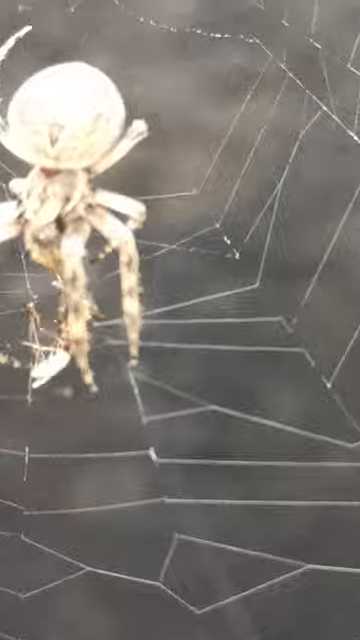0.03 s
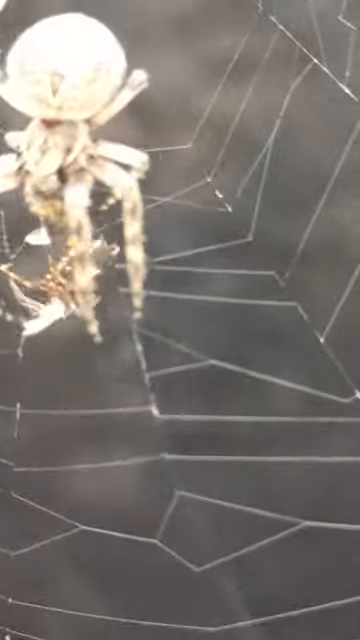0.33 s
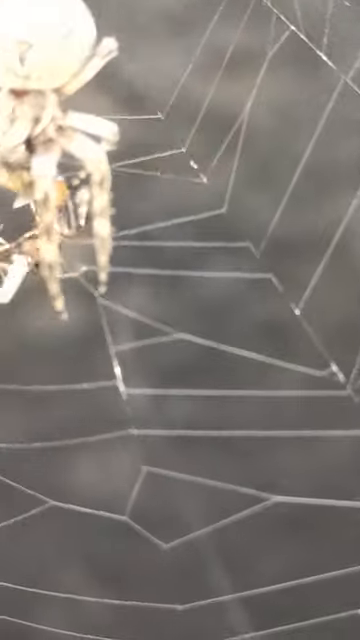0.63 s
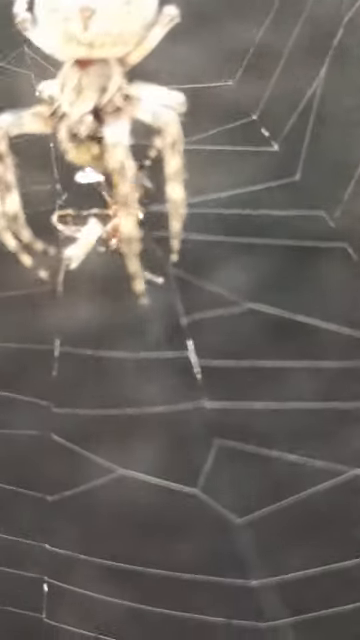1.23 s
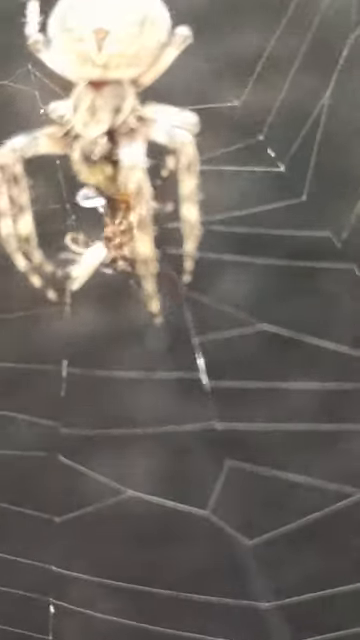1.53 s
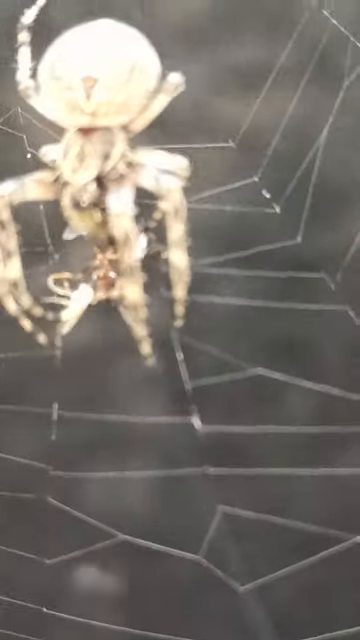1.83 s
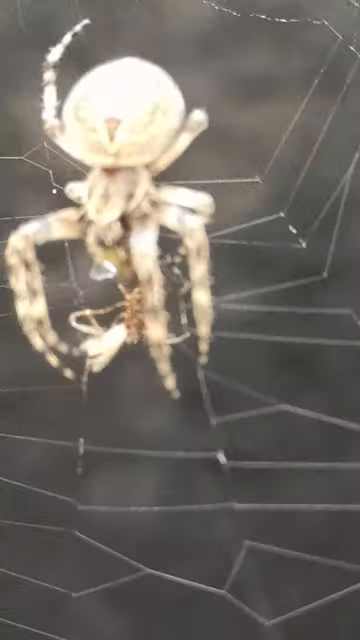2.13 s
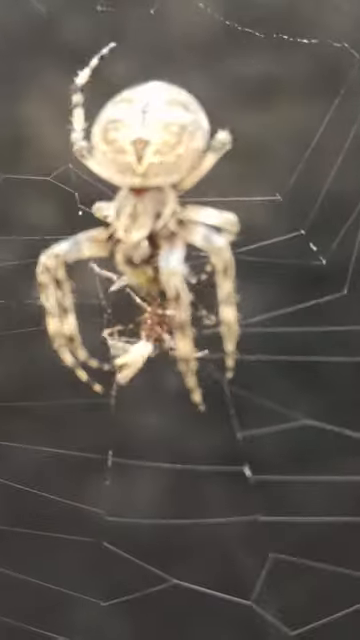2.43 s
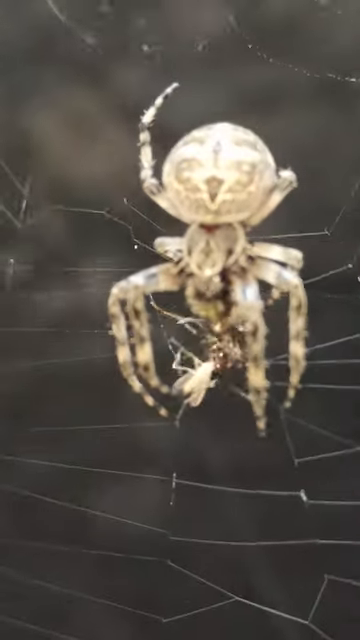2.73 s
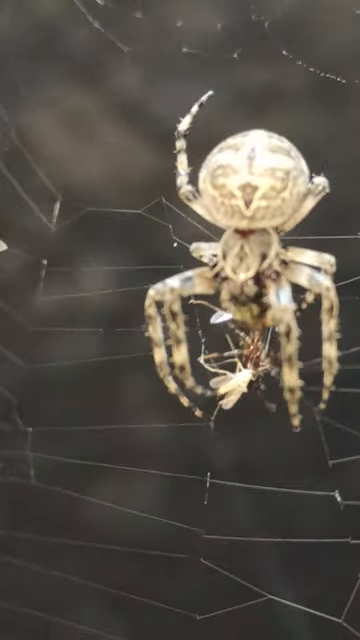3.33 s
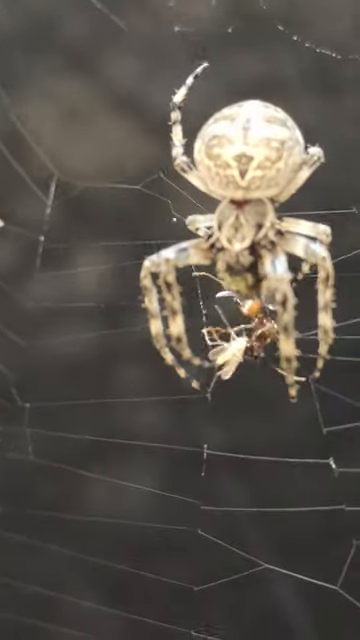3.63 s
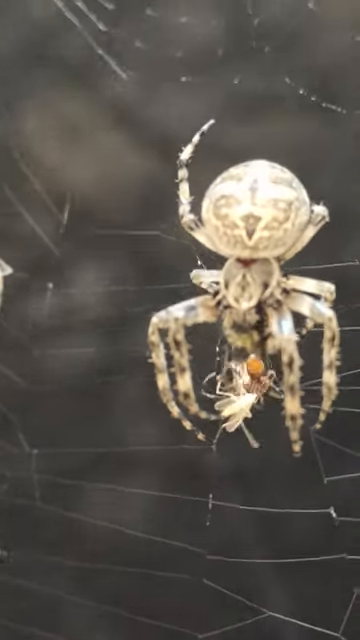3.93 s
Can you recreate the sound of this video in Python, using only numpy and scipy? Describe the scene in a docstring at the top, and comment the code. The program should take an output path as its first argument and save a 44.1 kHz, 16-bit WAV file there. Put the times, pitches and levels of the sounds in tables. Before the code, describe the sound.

Katydids and crickets chirp densely outdoors at night, with distant traffic and light microphone handling.

```python
"""Three katydids rasp in the night, each dragging a scraper over file teeth that ring its wing.
Behind them a far crowd sizzles, a small cricket trills at 9 kHz, two far crickets chirp below it and a
thin whine pulses on top. A distant engine climbs and falls over traffic rumble, mains hum and one brief
drone. Fingers click, rub and thud on the hand-held microphone. Near the end the level of the insects,
rumble and hum dips briefly."""
import sys
import numpy as np
from scipy import signal
from scipy.fft import rfft, irfft
from scipy.io import wavfile
from scipy.ndimage import uniform_filter1d, minimum_filter1d

SR = 44100
rng = np.random.default_rng(int(sys.argv[2]) if len(sys.argv) > 2 else 0)


def transcribe(u):
    """Save the signal u as a 16-bit wav file named by the first command-line argument.

    u: samples, shape (n,) or (channels, n), limited to [-1, 1]; the rate is SR.
    q: integer samples, one column per channel.
    """
    v = np.clip(np.atleast_2d(u).T, -1, 1)
    q = np.round(v * 32767).astype(np.int16)
    wavfile.write(sys.argv[1], SR, q)


N = 176400

# EQ curves of the rumble and air, the insect crowd and a finger rub: f/Hz, relative level/dB
AIR_EQ = [(20, -24), (35, -14), (55, -2.5), (90, 1.5), (130, 2), (190, 0), (260, -7.5), (400, -11.5),
          (700, -14), (1200, -17.5), (3000, -27.5), (8000, -33), (15000, -33.5)]
CROWD_EQ = [(1200, -30), (1550, -20), (1850, -12.5), (2200, -14), (2850, -9), (3550, -11.5), (4000, -5.5),
            (4700, 0.5), (5400, -2), (5800, -0.5), (6150, 0), (6400, -10), (6650, -22), (7100, -28),
            (8300, -31.5), (15000, -33.5)]
RUB_EQ = [(2000, -34), (4000, -2), (5400, 5), (7000, -18), (9000, -21), (11000, -18), (12000, -26),
          (15000, -31)]
# mains hum partials: f/Hz, level/dB
HUM_PARTIALS = [(120, -37), (240, -42), (600, -45.5), (720, -53), (1081, -61)]
# engine revs: t/s, firing f/Hz, level/dB
ENGINE_REVS = [(0, 81.6, -37.5), (.28, 90.7, -34), (.5, 97.4, -43), (.75, 104.6, -27.5), (1.0, 113.1, -24),
               (1.251, 117.6, -36.5), (1.48, 123, -39), (1.6, 110.8, -27), (1.75, 102.2, -48.5),
               (2.15, 98, -37), (2.4, 101.7, -30.5), (2.55, 103.4, -37), (2.7, 104.1, -27.5),
               (2.92, 104.9, -25), (3.05, 113.7, -33.5), (3.4, 122, -26.5), (3.65, 126.8, -35),
               (3.799, 124, -53)]
# thuds of the hand on the casing: t/s, level/dB, decay t60/s, upper edge f/Hz
THUDS = [(0.729, -18.5, 0.34, 170), (.785, -23.5, 0.32, 210), (1.13, -21, 0.19, 172),
         (2.655, -27, 0.25, 552.5), (2.76, -28, 0.15, 300), (2.89, -24.5, .3, 189.7),
         (3.93, -31, 0.16, 400)]
# finger clicks: t/s, level/dB, ring f/Hz, ring t60/s
CLICKS = [(2.2499, -9.5, 6300, 0.039), (2.2555, -10, 6100, .02), (2.2626, -12, 6700, 0.01),
          (3.066, -1, 5520, 0.0077), (3.0712, 0, 5100, 0.0081), (3.13, 12, 5100, 0.0051),
          (3.1535, -6, 5400, .006), (3.1998, -5, 5600, 0.0047)]
# light rubs across the casing: centre t/s, level/dB
RUBS = [(1.125, -29), (3.172, -20.5)]
# chirps of the low and the high far cricket: centre t/s, level/dB
LOW_CHIRPS = [(.07, -33), (.216, -36), (.669, -39.5), (.824, -38), (.968, -32.5), (1.6, -48), (1.74, -35),
              (1.881, -38), (2.092, -44), (2.388, -40), (2.503, -42), (2.658, -36), (2.79, -38),
              (3.497, -36), (3.835, -37), (3.974, -39)]
HIGH_CHIRPS = [(.193, -53), (.488, -49), (.752, -56), (1.028, -51), (1.256, -47), (1.605, -50),
               (1.822, -53), (2.111, -45), (2.438, -49), (2.64, -51), (2.891, -48), (3.497, -50)]
# trills of the small cricket: first pulse t/s, pulse count, level/dB
TRILLS = [(.1941, 8, -28.5), (0.4744, 8, -28), (.7403, 7, -28), (1.0246, 8, -28), (1.307, 8, -28),
          (1.5812, 8, -28), (1.857, 8, -27.5), (2.1345, 7, -28), (2.3917, 8, -27), (2.6553, 8, -30),
          (2.9325, 8, -29), (3.222, 7, -31.5), (3.475, 8, -32.5), (3.722, 8, -35.5), (3.959, 8, -36)]
# wing strokes of the broad, the shrill and the far katydid: centre t/s, relative level/dB
BROAD_RASPS = [(.02, -23.5), (.155, -26.5), (.225, -29), (.301, -25), (.42, -29), (.724, -34),
               (.865, -28.5), (1.11, -23.5), (1.238, -25), (1.396, -29.5), (1.586, -21), (1.74, -20.5),
               (1.884, -21), (2.022, -21), (2.125, -27), (2.275, -25), (2.41, -23), (2.53, -24.5),
               (2.665, -30), (2.806, -23.5), (2.96, -22), (3.095, -22), (3.24, -24), (3.38, -30),
               (3.53, -30.5), (3.97, -31.5)]
SHRILL_RASPS = [(.015, -16.5), (.09, -22), (.165, -19), (.245, -21.5), (.336, -19), (.477, -22), (.6, -17),
                (.722, -17.5), (.848, -17), (.976, -17), (1.106, -20), (1.234, -20.5), (1.373, -19),
                (1.53, -17.5), (1.62, -18.5), (1.715, -17.5), (1.845, -18), (1.98, -15.5), (2.102, -16.5),
                (2.2, -21), (2.289, -21), (2.408, -20), (2.583, -17.5), (2.70, -17), (2.842, -14.5),
                (2.975, -20.5), (3.11, -18.5), (3.255, -16.5), (3.401, -20), (3.52, -24.5), (3.75, -21.5),
                (3.86, -18.5), (3.98, -20)]
FAR_RASPS = [(.04, -22.5), (.164, -22), (.27, -22.5), (.431, -19.5), (.569, -22), (.708, -22), (.832, -25),
             (.963, -21), (1.087, -23), (1.221, -22), (1.36, -23), (1.53, -21), (1.68, -27), (1.825, -20),
             (1.997, -21.5), (2.14, -22.5), (2.409, -23), (2.563, -20.5), (2.805, -21), (2.93, -27)]
# their wing resonances: f/Hz, width/Hz, relative level/dB
BROAD_WING = [(1855, 430, -4.5), (2880, 1000, -0.5), (4220, 620, 2), (5100, 430, -0.5), (7200, 1200, -68),
              (11100, 3400, -27)]
SHRILL_WING = [(2750, 1350, -16), (4150, 700, -3.5), (4700, 690, 2.5), (5220, 600, -1.5)]
FAR_WING = [(5500, 300, 0), (6000, 230, -1)]
# fader ride on insects, rumble and hum, held at its first value until the dip: t/s, gain/dB
FADER = [(3.25, -4), (3.321, -6.5), (3.45, -6), (3.6, -7.5), (3.7, -12.3), (3.8, -10.2), (3.91, -7),
         (3.97, -4.5)]


def undb(db):
    """Decibels to gain."""
    return 10 ** (np.asarray(db) / 20)


def unit(x):
    """Scale to rms 1."""
    return x / np.sqrt(np.mean(x ** 2))


def clock():
    """Time of every sample in seconds."""
    return np.arange(N) / SR


def wander(rate_hz):
    """Smooth random modulation with a spread near 1."""
    hold = int(SR / rate_hz)
    steps = np.repeat(rng.standard_normal(N // hold + 1), hold)
    return .97 * uniform_filter1d(uniform_filter1d(steps, hold), hold)[:N]


def equalise(x, curve):
    """Shape a sound with an EQ curve (f/Hz, level/dB), at rms 1."""
    hz, db = np.array(curve, float).T
    f = np.maximum(np.arange(N // 2 + 1) * SR / N, 1)
    return unit(irfft(rfft(x) * undb(np.interp(np.log(f), np.log(hz), db)), N))


def ring(x, resonances):
    """Play a sound through steep resonances (f/Hz, width/Hz, level/dB), at rms 1."""
    f = np.maximum(np.arange(N // 2 + 1) * SR / N, 1)
    power = sum(undb(db) ** 2 / (1 + ((f * f - hz * hz) / (f * width)) ** 2) ** 2
                for hz, width, db in resonances)
    return unit(irfft(rfft(x) * np.sqrt(power), N))


def swells(cues, length_s):
    """A bell-shaped swell on each cue (t/s, level/dB), length_s wide at half power."""
    t = clock()
    power = sum(undb(db) ** 2 * np.exp2(-np.minimum((2 * (t - at) / length_s) ** 2, 100))
                for at, db in cues)
    return np.sqrt(power)


def foliage(x, wet_db, t60_s=.11):
    """Leaves and ground scatter a short tail after the direct sound."""
    t = np.arange(SR // 5) / SR
    tail = rng.standard_normal(len(t)) * np.exp(-np.log(1000) * t / t60_s)
    wet = signal.fftconvolve(x, tail / np.linalg.norm(tail))[:len(x)]
    return (x + undb(wet_db) * wet) / np.hypot(1, undb(wet_db))


def rumble():
    """A gently breathing bed of far traffic and air."""
    return equalise(rng.standard_normal(N), AIR_EQ) * undb(-28 + 1.4 * wander(5.91))


def mains_hum():
    """Electrical plant hums, each partial drifting in level and phase."""
    out = np.zeros(N)
    for hz, db in HUM_PARTIALS:
        peak = np.sqrt(2) * undb(db + 1.1 * wander(5.12))
        out += peak * np.sin(2 * np.pi * hz * clock() + .29 * wander(3.85))
    return out


def drone(at_s=.4, hz=319, db=-40):
    """A faint, far tone swells once and is gone."""
    return unit(np.sin(2 * np.pi * hz * clock())) * swells([(at_s, db)], length_s=.14)


def engine(flutter_db=2, jitter_rad=.48):
    """Only the firing note of a far vehicle carries, climbing between gear changes."""
    at, hz, db = np.array(ENGINE_REVS, float).T
    t = clock()
    phase = 2 * np.pi * np.cumsum(np.interp(t, at, hz)) / SR + jitter_rad * wander(35)
    return unit(np.sin(phase)) * undb(np.interp(t, at, db) + flutter_db * wander(18))


def grip_thuds(attack_s=.0088, low_hz=66):
    """The grip shifts and the casing gives dull, short thuds."""
    t, out = clock(), np.zeros(N)
    for at, db, t60, top_hz in THUDS:
        age = np.maximum(t - at, 0)
        band = signal.butter(2, [low_hz, top_hz], "band", fs=SR, output="sos")
        body = unit(signal.sosfilt(band, rng.standard_normal(N)))
        envelope = (1 - np.exp(-age / attack_s)) * np.exp(-np.log(1000) * age / t60)
        out += undb(db) * body * envelope
    return out


def finger_clicks(attack_s=.00012, crack_s=.0005, crack_db=-20):
    """Fingers tick against the casing: a tiny crack, then a bright ring."""
    t, out = clock(), np.zeros(N)
    for at, db, hz, t60 in CLICKS:
        age = np.maximum(t - at, 0)
        body = np.sin(2 * np.pi * hz * age) * np.exp(-np.log(1000) * np.minimum(age / t60, 10))
        crack = rng.standard_normal(N) * np.exp(-np.minimum(age / crack_s, 20))
        attack = 1 - np.exp(-np.minimum(age / attack_s, 20))
        out += undb(db) * attack * (body + undb(crack_db) * crack)
    return out


def finger_rubs():
    """Fingers brush the casing in short, gritty swipes."""
    grit = rng.standard_normal(N) * (rng.random(N) < .3)
    return equalise(grit, RUB_EQ) * swells(RUBS, length_s=.034)


def whine(hz=14999, period_s=.0667, gap_at_s=.068, gap_s=.012):
    """A thin, very high tone that ducks and wobbles fifteen times a second."""
    t = clock()
    cycles_from_gap = ((t - gap_at_s) / period_s + .5) % 1 - .5
    gate = 1 - .68 * np.exp(-(cycles_from_gap * period_s / gap_s) ** 2)
    roughness = .5 * wander(250)
    wobble = np.cos(2 * np.pi * cycles_from_gap)
    tone = np.sin(2 * np.pi * hz * t + roughness + wobble)
    return unit(tone * gate * undb(1.2 * wander(120))) * undb(-45.5)


def crowd(clicks_per_s=4500, scatter_db=2, flicker_db=.2):
    """Countless far katydids merge into a grainy, lightly flickering sizzle."""
    struck = rng.random(N) < clicks_per_s / SR
    clicks = struck * np.sign(rng.standard_normal(N)) * undb(scatter_db * rng.standard_normal(N))
    return equalise(clicks, CROWD_EQ) * undb(-19.5 + flicker_db * wander(25.03))


def far_cricket(chirps, hz, width_hz, length_s):
    """Chirps blurred by distance into narrow, wavering notes."""
    return ring(rng.standard_normal(N), [(hz, width_hz, 0)]) * swells(chirps, length_s)


def small_cricket(pitch_hz=9125, sag_hz_per_s=60000, spacing_s=.0104, pulse_s=.009, first_pulse_db=-6):
    """Trills of seven or eight pure pulses, each sagging in pitch as the wing slows."""
    t, out = clock(), np.zeros(N)
    for start, count, db in TRILLS:
        for k in range(count):
            at = start + k * spacing_s
            span = slice(*np.searchsorted(t, [at - pulse_s / 2, at + pulse_s / 2]))
            offset = t[span] - at
            hz = pitch_hz * (1 + .004 * rng.standard_normal())
            gain = undb(db + first_pulse_db * (k == 0) + rng.standard_normal())
            cycles = hz * offset - sag_hz_per_s * offset ** 2 / 2 + rng.random()
            out[span] += gain * np.cos(np.pi * offset / pulse_s) * np.sin(2 * np.pi * cycles)
    return foliage(out, wet_db=-15)


def katydid(rasps, wing, rasp_s, teeth_hz, wet_db, jitter=.12, speed_spread=.04, scatter_db=2):
    """Each stroke drags a scraper over file teeth at its own speed; the uneven strikes ring the wing."""
    half, strokes = SR // 5, np.zeros(N + SR)
    offset = np.arange(-half, half) / SR
    envelope = np.exp2(-2 * (offset / rasp_s) ** 2)
    for at, db in rasps:
        gap, force = rng.standard_normal(size=(400, 2)).T
        stroke_hz = teeth_hz * (1 + speed_spread * rng.standard_normal())
        strike_s = np.cumsum(np.abs(1 + jitter * gap)) / stroke_hz
        teeth = np.bincount((strike_s * SR).astype(int), undb(scatter_db * force), 2 * half)[:2 * half]
        scattered = unit(foliage(teeth, wet_db))  # the microphone moves: a new tail for every stroke
        start = int(at * SR)
        strokes[start:start + 2 * half] += undb(db) * scattered * envelope
    strokes = strokes[half:half + N]  # centre each stroke on its cue
    return ring(strokes, wing) * np.std(strokes)


def scene():
    """Insects, rumble and hum share one fader; drone, engine and handling noise bypass it."""
    broad = undb(3.3) * katydid(BROAD_RASPS, BROAD_WING, rasp_s=.054, teeth_hz=321, wet_db=5)
    shrill = undb(2) * katydid(SHRILL_RASPS, SHRILL_WING, rasp_s=.07, teeth_hz=240.1, wet_db=6.5)
    far = katydid(FAR_RASPS, FAR_WING, rasp_s=.099, teeth_hz=289.3, wet_db=6)
    low = far_cricket(LOW_CHIRPS, hz=1602, width_hz=88, length_s=.046)
    high = far_cricket(HIGH_CHIRPS, hz=7660, width_hz=240, length_s=.12)
    insects = broad + shrill + far + low + high + crowd() + small_cricket() + whine()
    fader = undb(np.interp(clock(), *np.array(FADER).T))
    night = fader * (insects + rumble() + mains_hum())
    return (night + drone() + engine() + finger_clicks() + finger_rubs() + grip_thuds())[None]


def record(dry):
    """A look-ahead limiter ducks around full-scale peaks; a steep filter cuts above 15.5 kHz."""
    hold = int(.026 * SR)
    reduction = 1 / np.maximum(np.abs(dry), 1)
    gain = uniform_filter1d(minimum_filter1d(reduction, hold), hold // 2)
    high_cut = signal.ellip(10, .1, 80, 15500, fs=SR, output="sos")
    return signal.sosfilt(high_cut, dry * gain)


dry = scene()
out = record(dry)
transcribe(out)
```